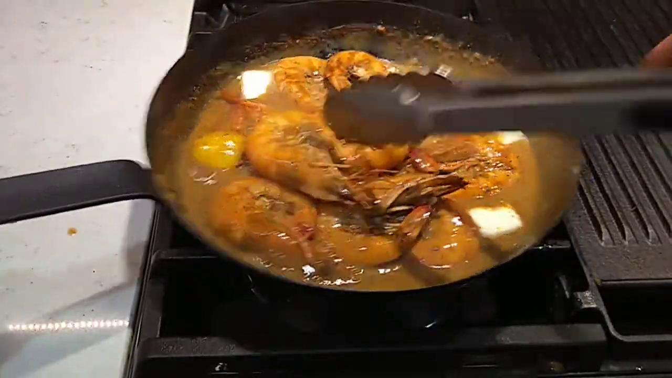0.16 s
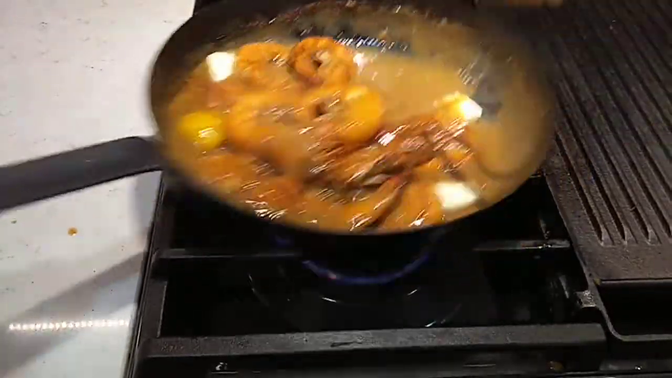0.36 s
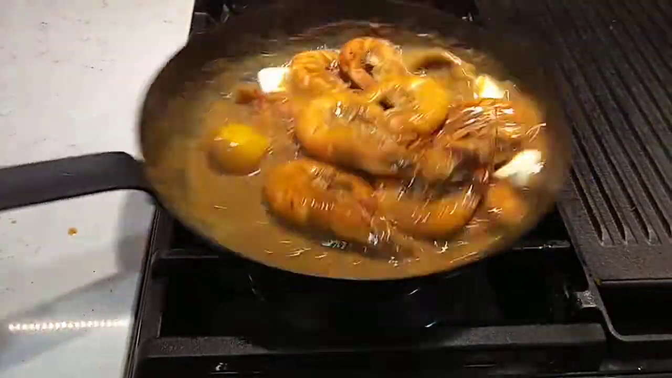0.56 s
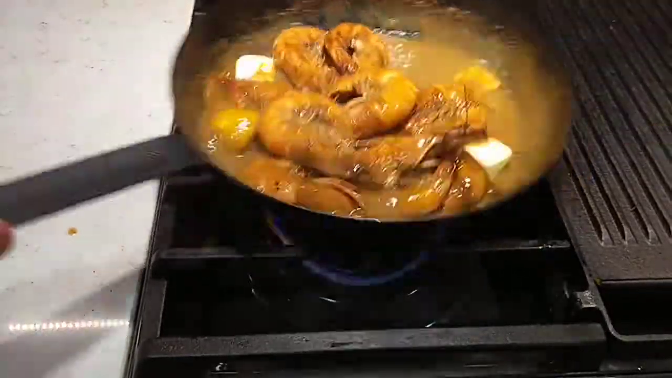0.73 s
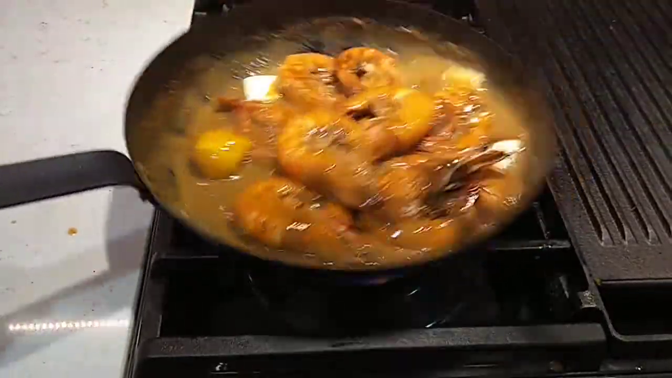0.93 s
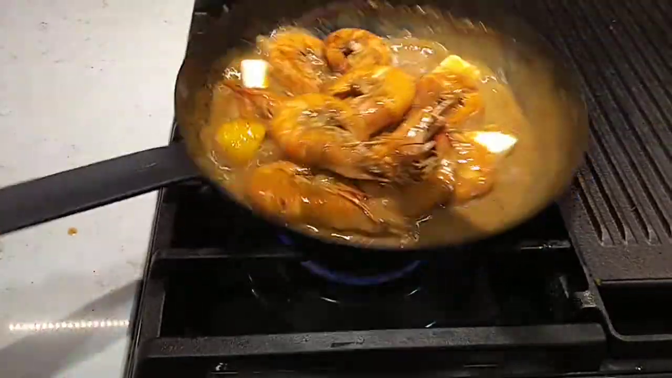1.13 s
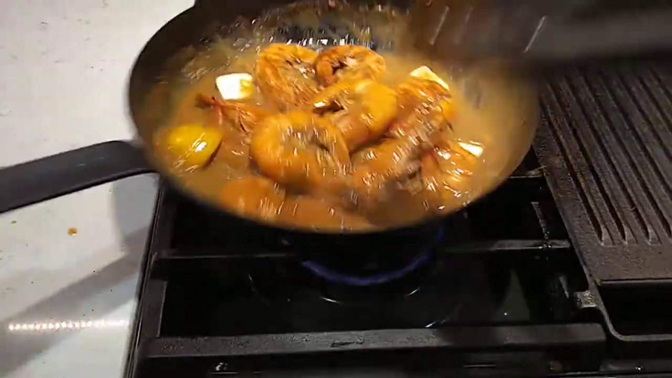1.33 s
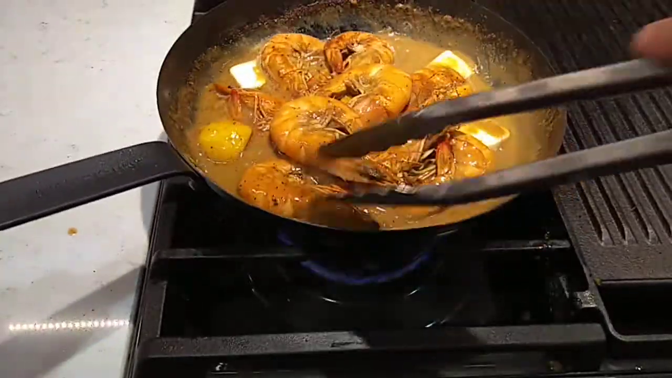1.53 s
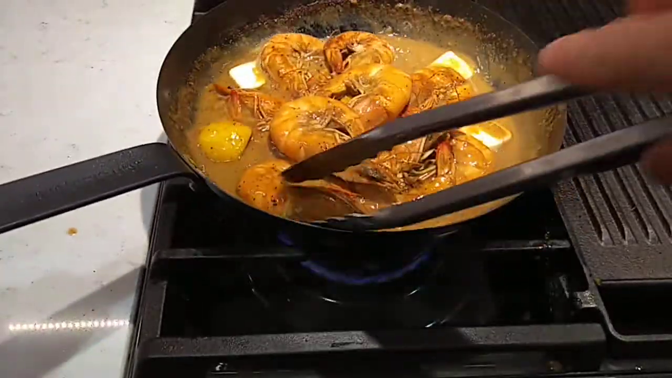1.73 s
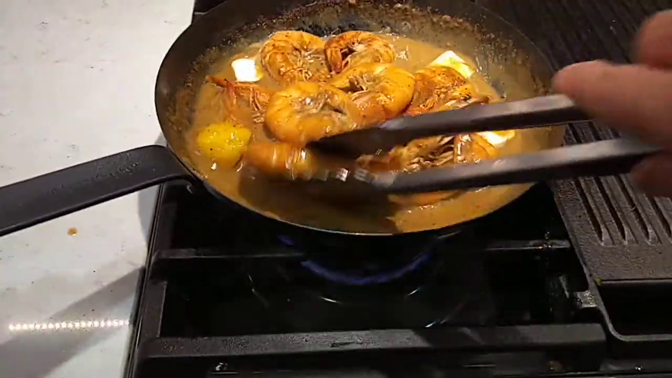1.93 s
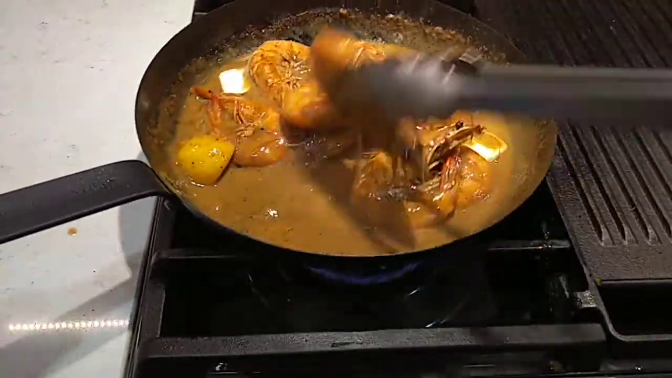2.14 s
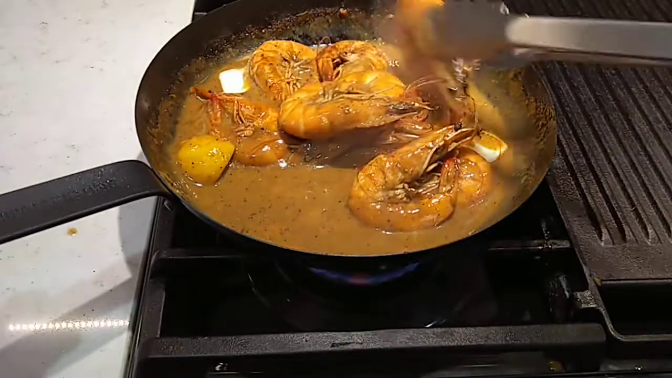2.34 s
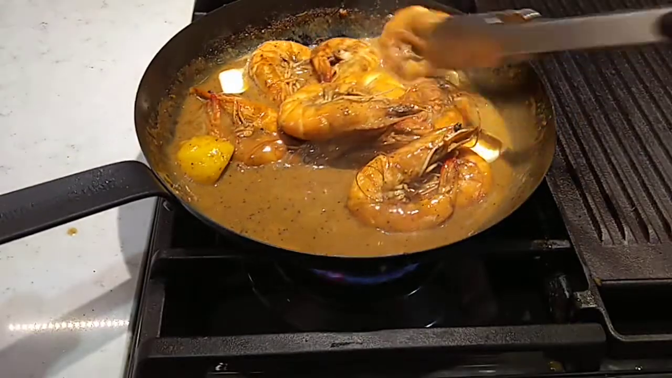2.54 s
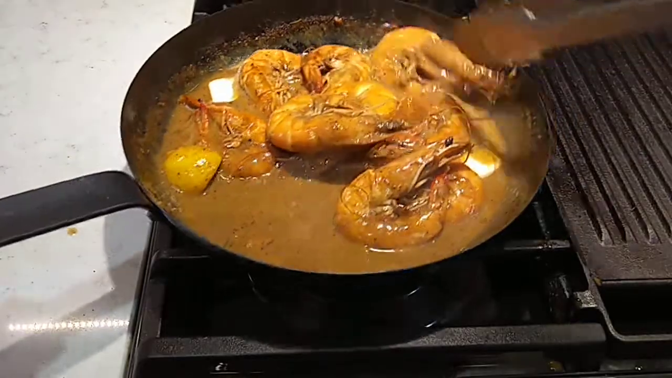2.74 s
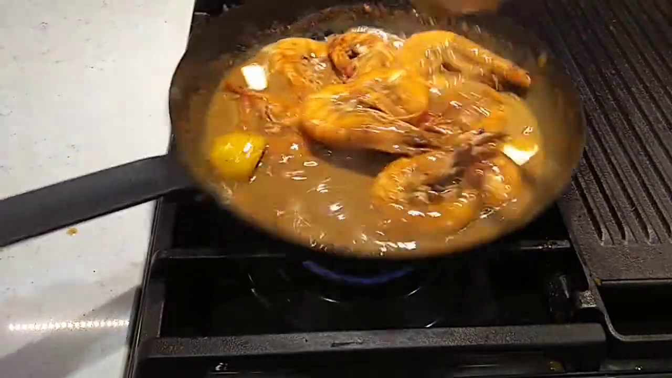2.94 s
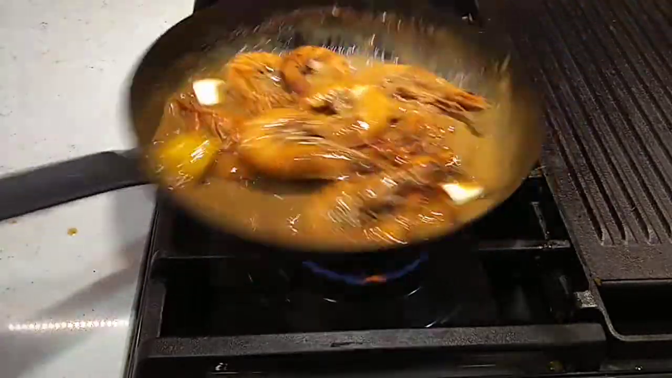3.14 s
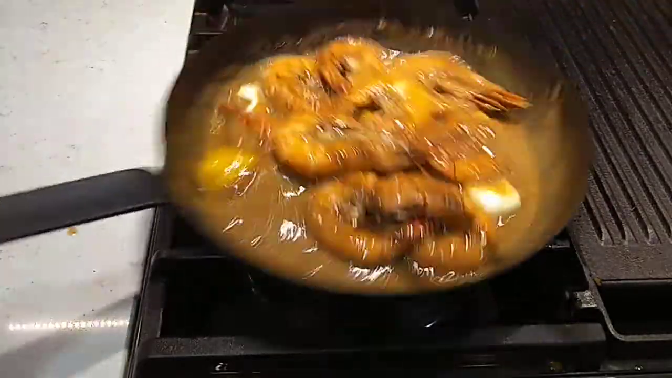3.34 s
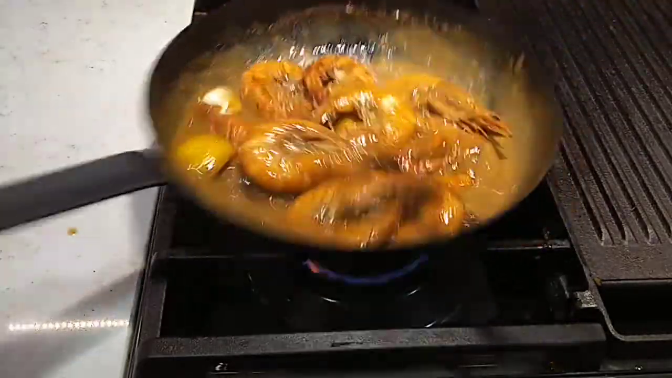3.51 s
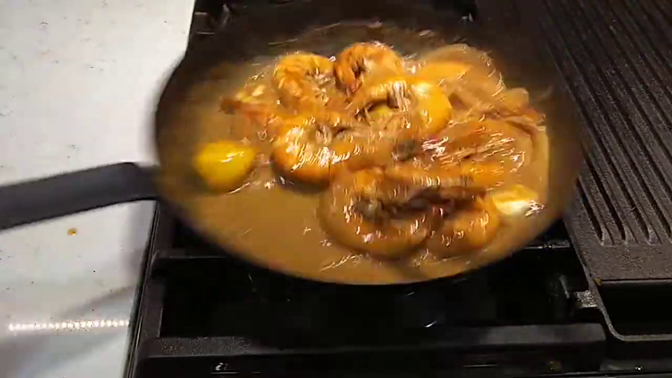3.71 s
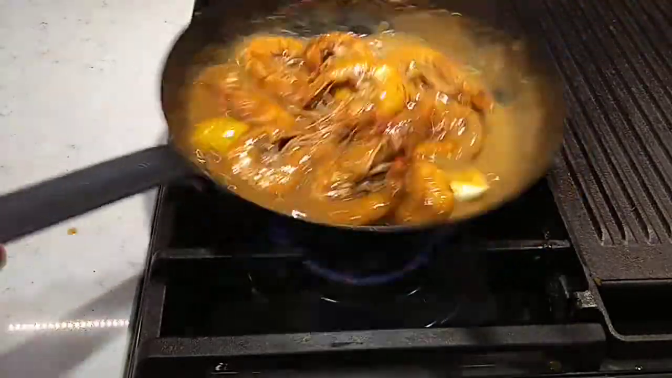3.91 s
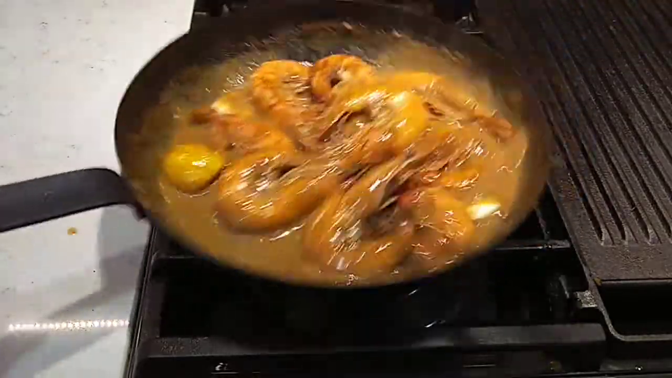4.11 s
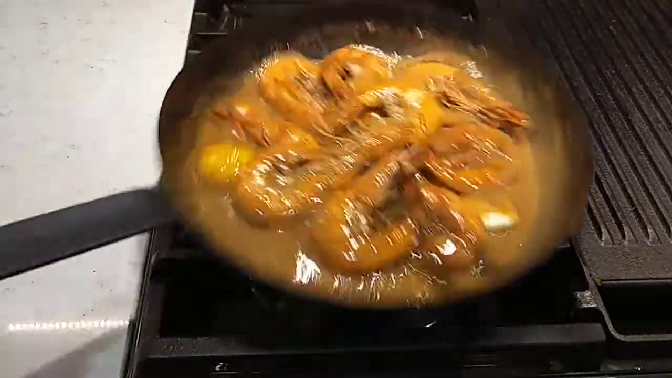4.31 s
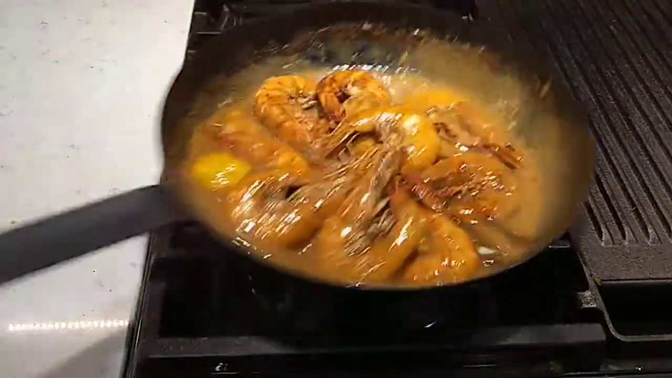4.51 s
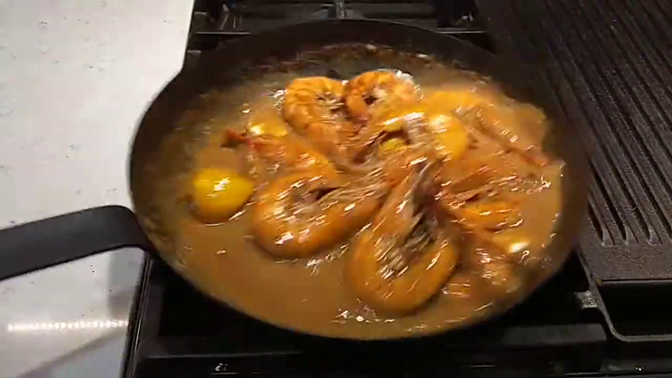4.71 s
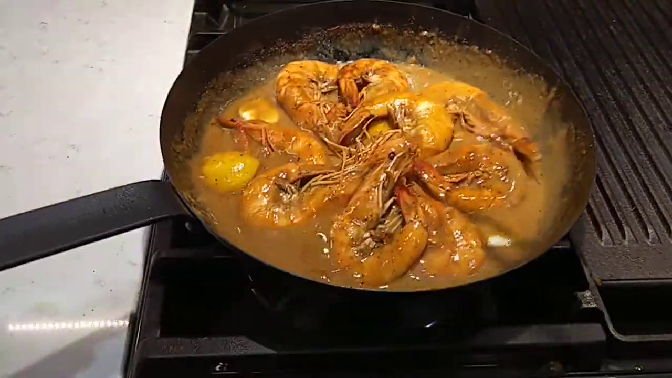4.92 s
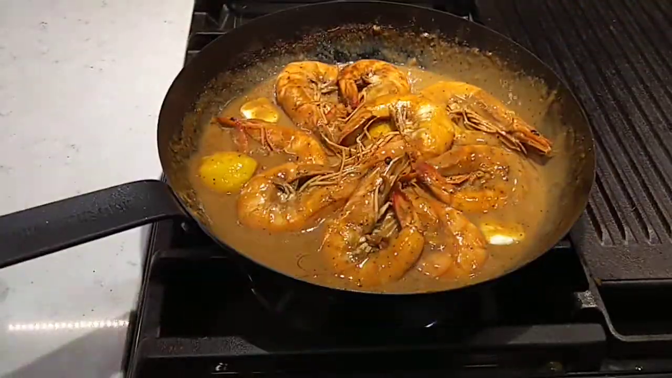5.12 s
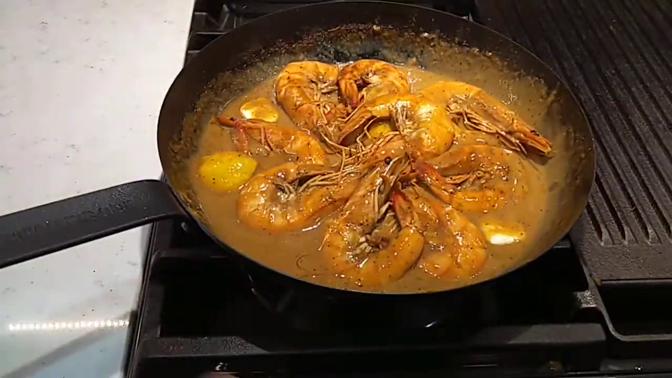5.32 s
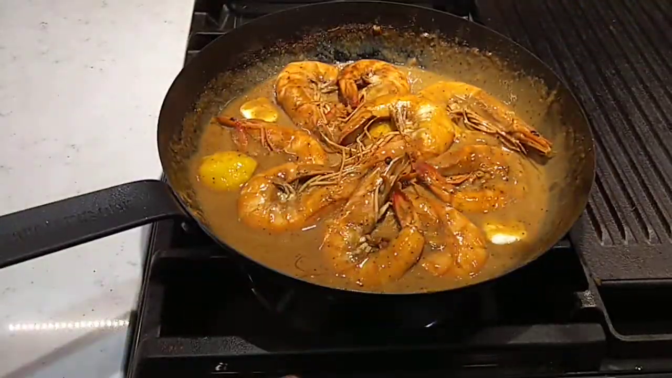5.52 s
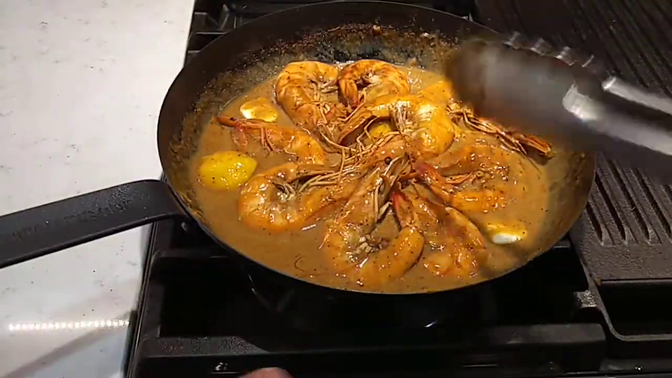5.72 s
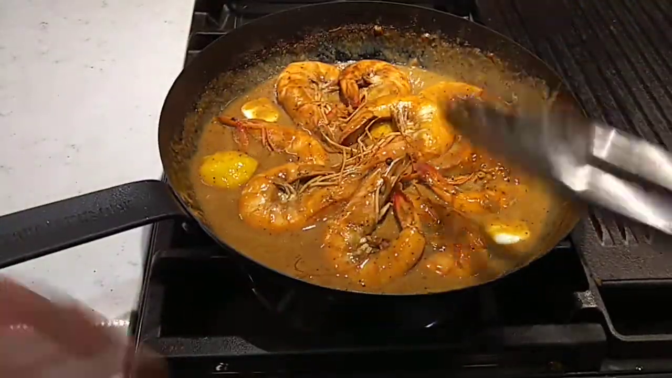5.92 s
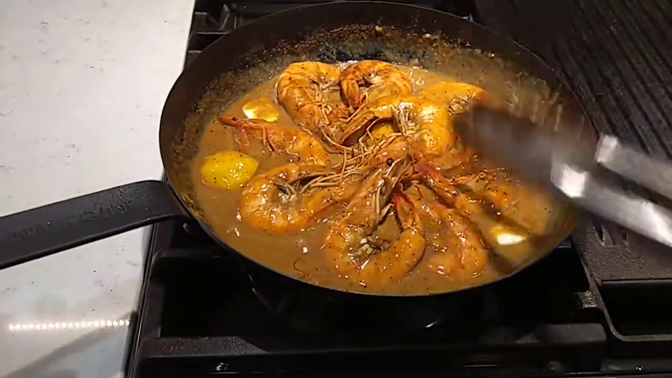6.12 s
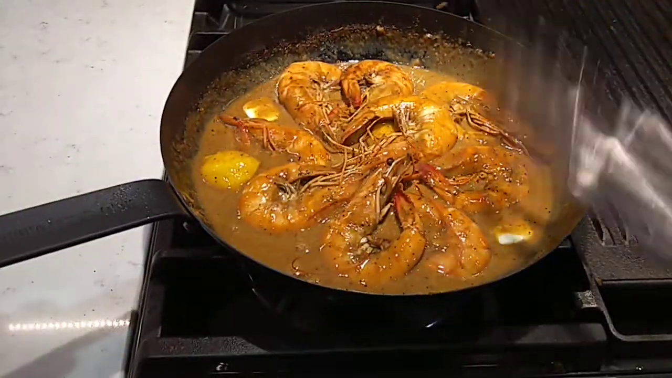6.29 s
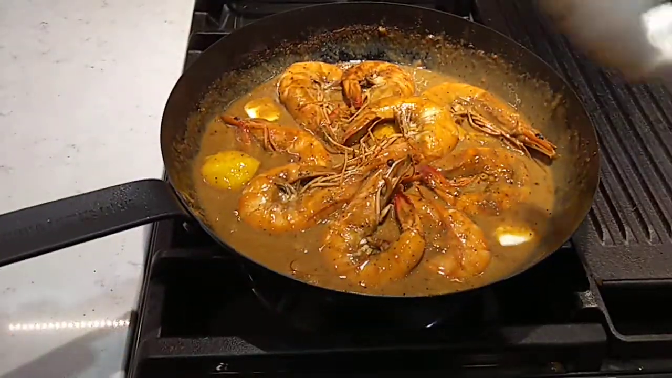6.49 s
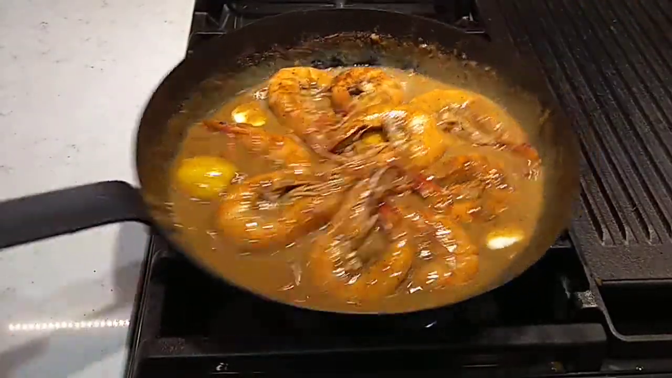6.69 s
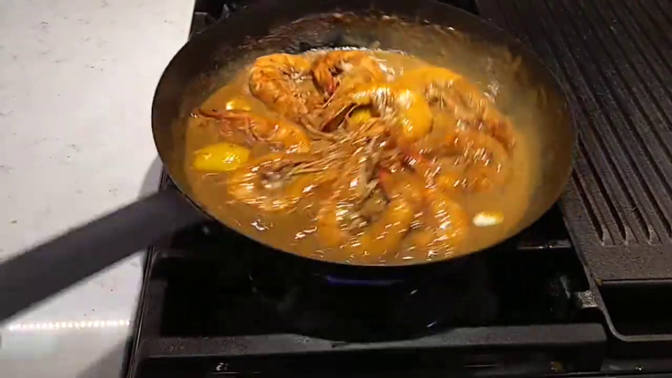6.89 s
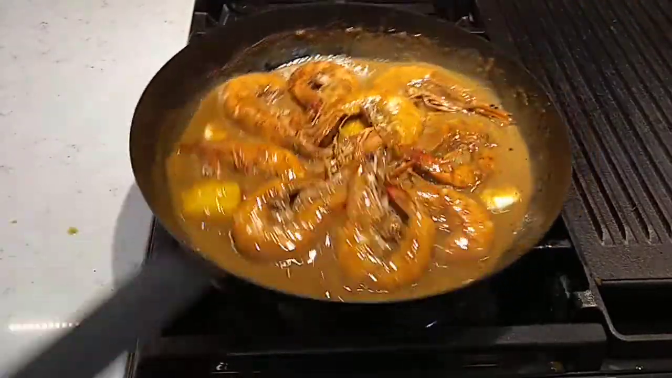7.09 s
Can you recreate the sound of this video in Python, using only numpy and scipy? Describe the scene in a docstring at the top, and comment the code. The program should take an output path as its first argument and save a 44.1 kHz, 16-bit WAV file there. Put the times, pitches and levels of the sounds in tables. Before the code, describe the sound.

A heavy steel skillet of prawns grinds and knocks across iron stove grates, with tongs clicking and later rapping its rim three loud, ringing times.

```python
"""Iron grate bars grind and hiss under a steel skillet of prawns, shuffled on a gas hob in a small kitchen.
Random slips shake the skillet's modes; damped noise resonances make its knocks on the bars.
Steel tongs, closer to the microphone pair, click in short bursts and rap the rim: two faint touches, then
three loud raps that swell and ring. Between moves, grains of noise make the sauce fizz and spit, steam squeals
briefly, and shaped noise with a faint hum is the hob's low rumble behind it all."""
import sys
import numpy as np
from scipy import signal
from scipy.fft import rfft, irfft, next_fast_len
from scipy.io import wavfile
from scipy.ndimage import uniform_filter1d, map_coordinates

SR = 44100
rng = np.random.default_rng(int(sys.argv[2]) if len(sys.argv) > 2 else 0)


def store_pcm(level_fs):
    """Save levels as 16-bit WAV."""
    pcm = np.round(np.clip(level_fs, -1, 1) * 32767).astype(np.int16)
    wavfile.write(sys.argv[1], SR, np.atleast_2d(pcm).T)


N = 315315
TIME = np.arange(N) / SR
RING_TIME = np.arange(SR) / SR  # one second, the longest single event

# pushes of the skillet across the grate:
# (time [s], length [s], grinding level before trim [dB], gritty treble level before trim [dB])
PUSHES = [(0.084, 0.084, -46.5, -49), (0.149, .17, -41, -37.5), (0.299, 0.096, -37.5, -36.5),
          (0.445, 0.12, -41, -38), (0.584, 0.084, -44, -35.5), (0.654, 0.43, -38.5, -36.5),
          (1.112, 0.13, -40, -37.5), (1.262, 0.11, -43.5, -40.5), (1.403, 0.042, -45, -51.5),
          (1.624, 0.045, -54, -39.5), (1.7, 0.021, -48, -34), (1.935, 0.1, -45.5, -49),
          (2.536, 0.071, -50.5, -52.5), (2.654, 0.13, -51.5, -46), (2.743, 0.084, -45.5, -39),
          (2.883, 0.19, -40.5, -38), (3.096, 0.19, -37, -36.5), (3.299, 0.16, -44, -39),
          (3.447, 0.23, -37.5, -38.5), (3.706, 0.13, -45, -39), (3.829, 0.13, -37.5, -40),
          (3.905, 0.13, -42.5, -37), (4.042, 0.18, -40, -40.5), (4.224, 0.15, -46, -37.5),
          (4.41, 0.086, -44, -35), (4.535, 0.19, -44, -40), (4.735, 0.066, -50, -38),
          (6.593, 0.26, -48, -40.5), (6.832, 0.025, -42, -53), (6.947, 0.1, -44.5, -45.5),
          (7.075, 0.073, -47, -40.5)]
# modes of the freely ringing skillet: (frequency [Hz], relative level [dB], t60 [s])
PAN_MODES = [(262, -6, 0.46), (312, -8, 0.47), (361, -4, 0.37), (404, -6, 0.37), (542, -6, 0.48),
             (759, -8, 0.54), (883, -15, 0.86), (1094, -11, 0.64), (1114, -6, 0.41), (1160, -5, 0.53),
             (1351, -4, 0.55), (1539, -6, 0.45), (1725, -5, 0.57), (1879, -3, 0.4), (2131, -9, 0.48),
             (2252, -7, 0.43), (2408, -2, 0.34), (2472, -3, 0.49), (2585, -10, 0.55), (2735, -5, 0.33),
             (3030, -4, 0.3), (3106, 0, 0.32), (3486, -1, 0.32), (3526, -9, 0.43), (3752, -11, 0.35),
             (4126, -14, 0.37), (4495, -13, 0.39), (4915, -13, 0.39)]
# spectrum of the base grinding on the bars: (frequency [Hz], relative level [dB])
GRIND_SPECTRUM = [(21, -40), (35, -13), (59, -2), (107, -15.5), (151, -1), (196, -16), (233, 0.5),
                  (288, -6), (343, 0.5), (527, -18.5), (760, -7.5), (922, -13.5), (3080, -11.5),
                  (4940, -18.5), (6000, -23), (7800, -70), (13200, -120)]
# spectrum of the grit hissing at the contact: (frequency [Hz], relative level [dB])
GRIT_SPECTRUM = [(3000, -7), (5000, -9), (6200, -6), (7500, -2.5), (9500, -2.5), (12500, 0.5),
                 (15300, -1.5), (16500, -23)]
# skillet base bumping on the bars: (time [s], level before trim [dB], resonance [Hz])
KNOCKS = [(0.027, -46, 1700), (0.173, -32, 1080), (0.319, -38, 960), (0.344, -38.5, 1540),
          (0.67, -39, 1500), (0.776, -34.5, 2670), (0.885, -45, 1470), (1.192, -34, 1750),
          (1.341, -32, 2190), (1.586, -35, 810), (1.6, -32, 227), (1.739, -40, 314), (1.964, -42.5, 534),
          (2.561, -43, 1030), (2.624, -33.5, 790), (2.975, -38, 510), (3.147, -28, 2230),
          (3.235, -40, 1930), (3.488, -34, 2180), (3.65, -34.5, 1080), (3.824, -37, 2190),
          (4.154, -32.5, 1830), (4.596, -39, 830), (4.639, -42.5, 800), (6.697, -41, 1480),
          (6.969, -42, 1220)]
# tongs striking the skillet: (time [s], level [dB], swell time constant [s], ring length before trim [factor],
# mode level before trim [dB], treble level before trim [dB], mode favoured by the point of impact [Hz])
RAPS = [(1.58, -30.5, 0.0014, 0.44, 4.5, 5.5, 3490), (2.616, -39, 0.0032, 0.38, 9, 14, 760),
        (5.8233, -14, 0.0077, 0.65, 5, -1, 1351), (6.045, -12.5, 0.015, 0.75, 3, -0.5, 2150),
        (6.283, -17, 0.0075, 0.85, 6, 3, 1230)]
# short clatter of the struck skillet: (frequency [Hz], relative level [dB])
CLATTER_SPECTRUM = [(35, 2), (55, -1), (100, -8), (200, -1.5), (330, 2), (620, -5), (1300, -3.5),
                    (2700, -3), (3700, -4.5), (5300, -13.5), (9000, -12), (16000, -16)]
# bright, grainy metallic crash of the rap: (frequency [Hz], relative level [dB])
CRASH_SPECTRUM = [(1500, -64), (2800, -1.5), (4100, 0.5), (5300, -2), (8000, 1), (10000, 1.5), (12000, 6),
                  (15500, 0.5), (16500, -45)]
# tong blades and hinge clicking:
# (time [s], level [dB], t60 [s], top pitch [Hz], rasp level [dB], left minus right [dB])
CLICKS = [(1.582, -23, .03, 9000, 0, 3), (1.598, -31, .02, 9000, 0, 3), (1.741, -23, .015, 12500, -1, 0),
          (2.6176, -14, .05, 13400, -7, 0), (5.7145, -33, .012, 14000, -3, 0),
          (5.7605, -16, .025, 14500, -5, 0), (5.776, -29, .08, 14500, -5, 0),
          (5.8255, -13, .04, 12500, -2, 0), (6.048, -15, .04, 12000, -2, 0),
          (6.285, -15, .04, 12200, -2, 0), (6.5198, -21, .02, 14400, -5, 0),
          (6.847, -12, .013, 14700, -11, -6)]
# thin ring of the tong blades, for a 40 ms click: (frequency [Hz], relative level [dB], t60 [s])
TONG_MODES = [(2850, -8, .04), (3600, -10, .04), (4750, -2, .05), (6600, -4, .05), (8800, -8, .04),
              (11500, -7, .035), (13250, -5, .035)]
# sauce spitting and shells ticking: (time [s], level [dB], t60 [s])
SPITS = [(.0255, -36, .012), (.093, -33, .005), (1.8528, -34, .006), (2.127, -34, .005), (2.22, -42, .03),
         (2.412, -41, .025), (2.453, -33, .008), (4.9826, -38, .03), (5.137, -50, .02), (5.153, -49, .03),
         (5.2455, -43, .025), (5.571, -50, .02), (5.626, -49, .03), (5.6695, -41, .03)]
# spectrum of bursting steam bubbles: (frequency [Hz], relative level [dB])
SIZZLE_SPECTRUM = [(1500, -15), (4000, -11), (8000, -9), (10500, -3.5), (12500, 0), (15000, -1.5),
                   (16500, -5)]
# steam squealing from under a squeezed prawn: (time [s], mean pitch [Hz], level [dB])
STEAM = [(2.12, 9800, -81), (2.23, 9900, -55), (2.29, 9100, -64), (2.45, 9100, -71)]
# spectrum of the hob's rumble: (frequency [Hz], relative level [dB])
HOB_SPECTRUM = [(18, -30), (30, -53), (43, -5), (65, -2), (128, -8.5), (150, -23), (219, -2), (264, -11.5),
                (303, -7), (544, -18), (584, -17.5), (1100, -30), (4570, -37), (4900, -42), (8000, -35),
                (10400, -78), (17600, -120)]

PUSH_ATTACK_S, PUSH_RELEASE_T60_S = 0.029, 0.34  # the skillet gathers speed, then coasts to rest
BITE_DB, BITE_T60_S = -7.5, 0.17  # extra grinding after a knock, relative to the knock's table level
HOB_DB = -55.5
TOP_HZ = 15900  # upper limit of the microphone pair


def sliding():
    """Rough iron catches on the steel base: dense slips shake the loaded skillet, grit hisses at the contact."""
    grind, grit = friction()
    slips = grains(rate=4000, spread_db=1.5) * undb(2.3 * walk(45))
    # the bars damp the skillet while it rests on them
    damped_ring = ring(PAN_MODES, length=.2)
    modes = unit(signal.fftconvolve(slips, damped_ring, axes=1)[:, :N])
    body = colour(slips, GRIND_SPECTRUM) + undb(-7.0) * modes
    body = shifting(body, depth_db=4.8, width_hz=190, hold_s=.045)
    hiss = colour(grains(rate=25000, spread_db=-1.5), GRIT_SPECTRUM) * undb(0.93 * walk(60))
    hiss = shifting(hiss, depth_db=6.0, width_hz=170, hold_s=.06)
    return undb(0.94) * grind * body + undb(2.5) * grit * hiss


def friction():
    """Strength of grinding and grit: both follow the pushes; the base bites harder after landing on a bar."""
    power = np.zeros((2, N))  # rows: grinding, grit
    for start, length, grind_db, grit_db in PUSHES:
        strength = undb([[grind_db], [grit_db]]) * push(length)
        add(power, start, strength ** 2)
    for start, db, _ in KNOCKS:
        bite = undb([[db + BITE_DB]]) * fade(BITE_T60_S)
        add(power[:1], start, bite ** 2)
    return np.sqrt(power)


def push(length):
    """Strength of one push: it builds up with the skillet's speed and dies away after the given length."""
    attack = np.minimum(RING_TIME / PUSH_ATTACK_S, 1)
    coasting = np.maximum(RING_TIME - length, 0)
    return attack * np.exp(-np.log(1000) * coasting / PUSH_RELEASE_T60_S)


def shifting(x, depth_db, width_hz, hold_s, size=1024):
    """A moving contact point crosses the nodes of the plate, so its resonances come and go one by one."""
    hz, times, spectrum = signal.stft(x, SR, nperseg=size)
    # a random surface over frequency and time, shared by both microphones
    field = rng.standard_normal((size, size))
    position = np.meshgrid(hz / width_hz, times / hold_s, indexing="ij")
    weights = np.clip(map_coordinates(field, position, mode="mirror"), -2.5, 1.6)
    _, shifted = signal.istft(spectrum * undb(depth_db * weights), SR, nperseg=size)
    return unit(shifted[:, :N])


def knocks():
    """The base drops over a bar: a dull, quickly damped clunk whose pitch depends on where it lands."""
    out = np.zeros((2, N))
    for start, db, hz in KNOCKS:
        thud = burst([(40, -12), (150, -9), (300, 4.5), (600, -3.0), (3400, -12.5), (6000, -39), (16000, -34)])
        clunk = (undb(-5) * thud + resonance(hz, q=3)) * fade(.17)
        clunk = clunk + undb(-10) * ring(PAN_MODES, length=.45)
        onset = 1 - fade(0.006)
        add(out, start, undb(db - 1.0) * clunk * onset)
    return out


def raps():
    """Tongs hit the rim and chatter: the treble leads, the wall's bending waves swell and ring on."""
    out = np.zeros((2, N))
    hz, mode_levels, t60 = np.transpose(PAN_MODES)
    for start, db, swell, length, mode_db, treble_db, favoured_hz in RAPS:
        chatter = undb(1.9 * walk(130)[:SR])
        clatter = undb(2.0) * burst(CLATTER_SPECTRUM) * chatter * fade(0.53 * length)
        crash = grainy_crash(CRASH_SPECTRUM, spacing_hz=28.0) * chatter * fade(0.32 * length)
        crash = undb(treble_db + 8.5) * crash
        # the point of impact favours the modes near one frequency
        favour_db = 6.5 * np.exp(-(np.log(hz / favoured_hz) / .03) ** 2)
        struck_modes = np.transpose([hz, mode_levels + favour_db, t60])
        modes = undb(mode_db - 2) * ring(struck_modes, .85 * length)
        rise = 1 - np.exp(-RING_TIME / swell)
        # the square root lets the treble come up sooner
        add(out, start, undb(db) * (rise * (clatter + modes) + np.sqrt(rise) * crash))
    return out


def grainy_crash(points, spacing_hz):
    """Bright, grainy metallic crash of the rap: noise thinned to random frequency lines, shaped to a spectrum."""
    kept = rng.random(SR // 2 + 1) < 1 / spacing_hz  # bins are 1 Hz apart
    lines = rfft(rng.standard_normal((2, SR))) * kept
    return colour(irfft(lines, SR), points)


def clicks():
    """Thin steel meets thin steel: a rasp, a piercing top resonance and the short ring of the blades."""
    out = np.zeros((2, N))
    for start, db, t60, hz, rasp_db, pan_db in CLICKS:
        rasp = burst([(200, -20), (1300, -5), (4700, 1), (8000, -1), (15000, 0)], side_db=-2)
        top = resonance(hz, q=5, side_db=-2)
        click = (undb(rasp_db) * rasp + top) * fade(t60)
        click = click + undb(-12) * ring(TONG_MODES, length=t60 / .04)
        pan = np.array([[pan_db], [-pan_db]]) / 2
        add(out, start, undb(db + pan) * click)
    return out


def sauce():
    """Tiny steam bubbles burst all the time; now and then a bigger one spits."""
    fizz = undb(-60.5 + 1.2 * walk(7)) * colour(grains(rate=6000, spread_db=1.5), SIZZLE_SPECTRUM)
    pops = undb(-66) * colour(grains(rate=350, spread_db=2), SIZZLE_SPECTRUM)
    out = fizz + pops
    for start, db, t60 in SPITS:
        snap = burst([(500, -14), (2500, -6), (8000, -5), (12500, 0), (16000, -2)], side_db=-4)
        add(out, start, undb(db) * snap * fade(t60))
    return out


def steam():
    """Escaping steam makes a thin whistle: a sine with an unsteady pitch, silent outside its table."""
    times, hz, db = np.transpose(STEAM)
    pitch = np.interp(TIME, times, hz) * (1 + .035 * walk(900))
    level = undb(np.interp(TIME, times, db, left=-np.inf, right=-np.inf))
    return level * np.sin(2 * np.pi * np.cumsum(pitch) / SR)


def hob():
    """Low rumble of the burner as shaped noise with a faint hum, both fluttering slightly."""
    rumble = colour(rng.standard_normal((2, N)), HOB_SPECTRUM) * undb(HOB_DB)
    hum = undb(-67) * np.sin(2 * np.pi * 57 * TIME)
    flutter = undb(.8 * walk(5))
    return flutter * (rumble + hum)


def kitchen(x):
    """Hard counters and walls answer within milliseconds; the treble dies first."""
    reflections = burst([(100, 5), (1000, 2.5), (8000, -2.5), (16000, -5.0)])
    low, high = split(reflections, hz=6940)
    response = (low * fade(0.52) + high * fade(0.13)) * (RING_TIME > .004)
    response /= np.sqrt(np.sum(response ** 2) / 2)
    return signal.fftconvolve(x, response, axes=1)[:, :N]


def undb(db):
    """Decibels to gain."""
    return 10 ** (np.asarray(db) / 20)


def unit(x):
    """Scale to rms 1."""
    return x / np.sqrt(np.mean(x ** 2))


def fade(t60):
    """Exponential decay, 60 dB down after t60 seconds."""
    return np.exp(-np.log(1000) * RING_TIME / t60)


def add(track, start, sound):
    """Mix a sound into a track from a given time on."""
    i = max(int(start * SR), 0)
    track[:, i:i + sound.shape[1]] += sound[:, :N - i]


def walk(rate):
    """Random levels held 1 / rate seconds, smoothed twice and scaled to rms 1."""
    hold = int(SR / rate)
    steps = np.repeat(rng.standard_normal(N // hold + 1), hold)
    smooth = uniform_filter1d(uniform_filter1d(steps, hold), hold)
    return unit(smooth[:N])


def grains(rate, spread_db):
    """Two trains of tiny random impacts, rate per second, their sizes spread exponentially in decibels."""
    spread = np.minimum(rng.exponential(size=(2, N)), 5)
    sizes = undb(spread_db * spread) * rng.standard_normal((2, N))
    return sizes * (rng.random((2, N)) < rate / SR)


def colour(pair, points, side_db=0):
    """Shape two signals to a spectrum; the microphones share most low-mid sound and little of the treble."""
    size = next_fast_len(pair.shape[1])
    hz = np.fft.rfftfreq(size, 1 / SR) + 1  # + 1 avoids log(0)
    knots, db = np.transpose(points)
    gain = undb(np.interp(np.log(hz), np.log(knots), db))
    mid, side = rfft(pair, size) * gain
    width_db = np.interp(hz, [60, 130, 380, 750, 1800], [-10, -16.0, -21.5, -3.5, -0.5])
    side = side * undb(side_db + width_db)
    left_right = irfft(np.array([mid + side, mid - side]), size)
    return unit(left_right[:, :pair.shape[1]])


def burst(points, side_db=0):
    """One second of coloured stereo noise."""
    return colour(rng.standard_normal((2, SR)), points, side_db)


def resonance(hz, q, side_db=0):
    """Noise in one resonance of sharpness q, with steep skirts."""
    ratio = 2 ** np.linspace(-2, 2, 201)  # two octaves either side
    db = -20 * np.log10(1 + (q * (ratio - 1 / ratio)) ** 2)
    return burst(np.transpose([hz * ratio, db]), side_db)


def ring(modes, length=1):
    """Decaying modes, weighted anew at each call; high ones reach the two microphones out of step."""
    out = np.zeros((2, SR))
    for hz, db, t60 in modes:
        phase, lag, weight = rng.uniform(-1.08, 1, 3)
        right_lag = lag * min(hz / 4000, 1)
        phases = np.pi * (phase + np.array([[0], [right_lag]]))
        tone = np.sin(2 * np.pi * hz * RING_TIME + phases)
        out += undb(db + 2 * weight) * fade(t60 * length) * tone
    return out / np.sqrt(np.sum(undb(np.array(modes)[:, 1]) ** 2) / 2)


def split(x, hz):
    """The parts of a sound under and over a frequency; they add up without a notch."""
    low = signal.sosfilt(signal.butter(2, hz, fs=SR, output="sos"), x)
    high = -signal.sosfilt(signal.butter(2, hz, "high", fs=SR, output="sos"), x)
    return low, high


def scene():
    """Skillet, tongs and sauce on the hob, in the kitchen; the tongs are held nearer to the microphones."""
    skillet = sliding() + knocks() + raps() + sauce() + steam()
    tongs = clicks()
    # being nearer, the tongs send less into the room
    room = kitchen(undb(-14) * tongs + undb(-12) * skillet)
    return skillet + tongs + room + hob()


def record(dry):
    """The left microphone hears a little later and fuller; deep bass is cut, peaks are rounded, the top is cut."""
    delay = 4  # samples
    pair = np.array([np.pad(dry[0], (delay, 0))[:N], dry[1]])
    low_mids = signal.sosfilt(signal.butter(1, [170, 520], "band", fs=SR, output="sos"), pair)
    balance = undb(np.array([[.3], [-.3]]))
    pair = pair * balance + 0.16 * np.array([[1], [-1]]) * low_mids
    pair = signal.sosfilt(signal.butter(4, 47, "high", fs=SR, output="sos"), pair)
    rounded = np.tanh(pair)
    return signal.sosfilt(signal.ellip(8, .2, 70, TOP_HZ, fs=SR, output="sos"), rounded)


dry = scene()
out = record(dry)
store_pcm(out)
```